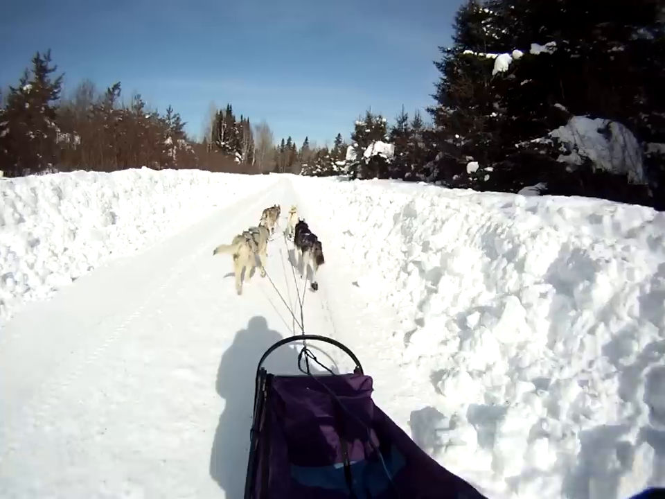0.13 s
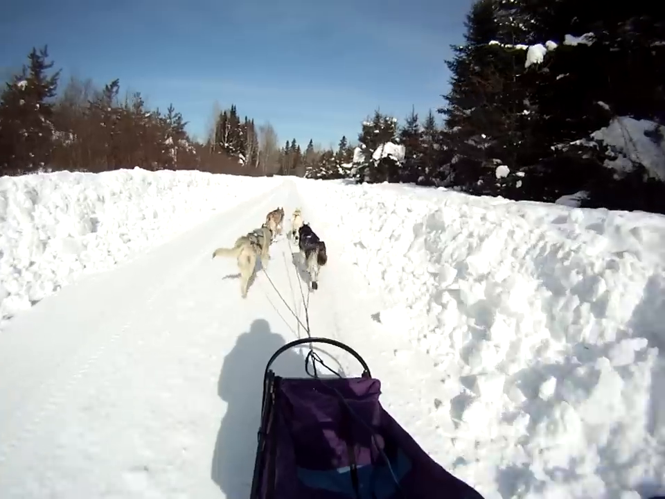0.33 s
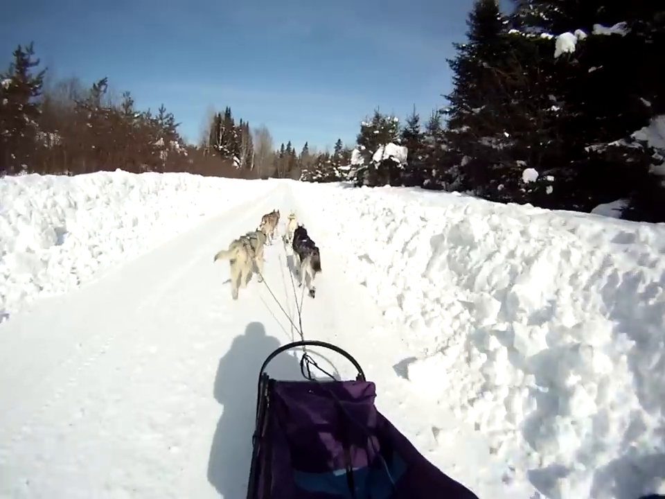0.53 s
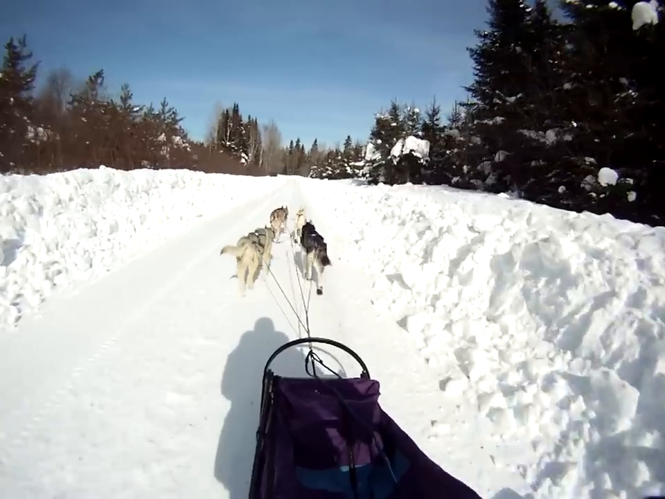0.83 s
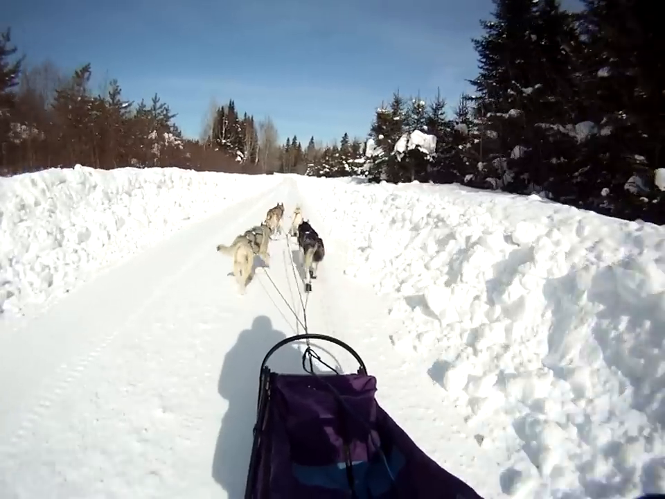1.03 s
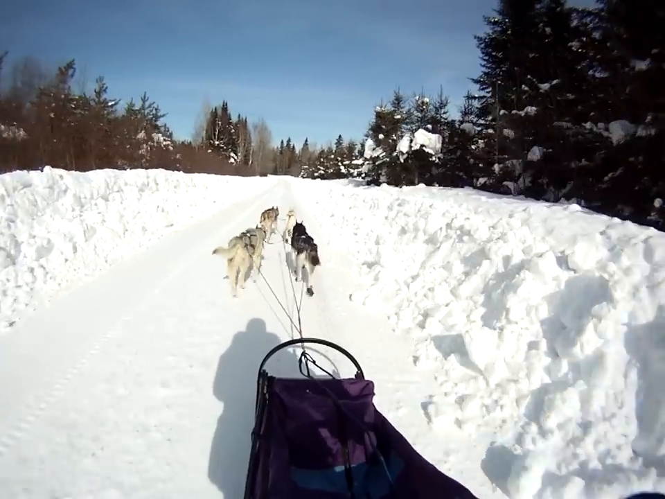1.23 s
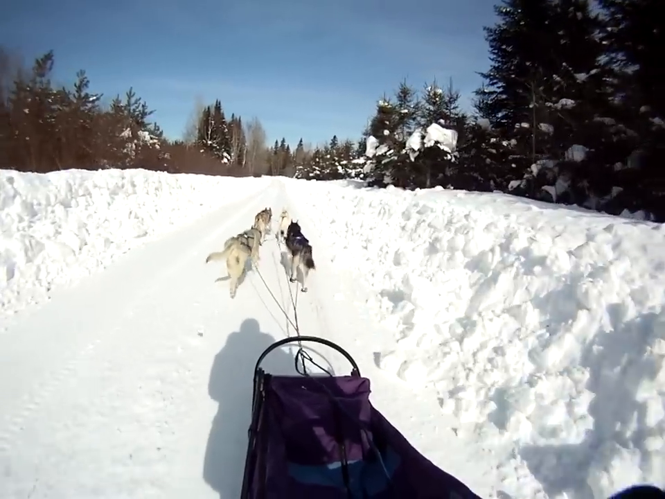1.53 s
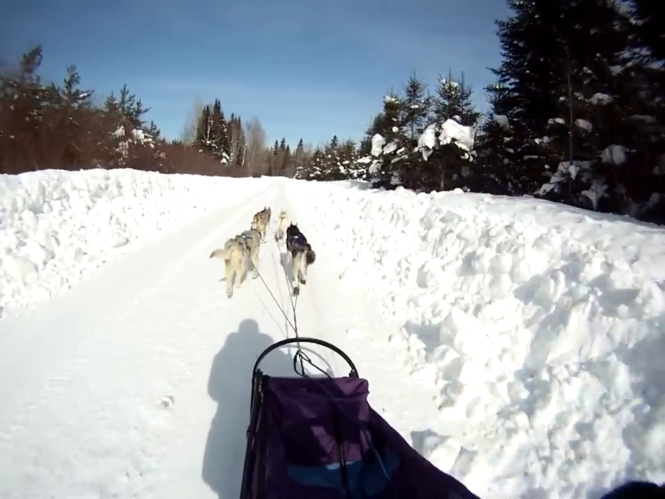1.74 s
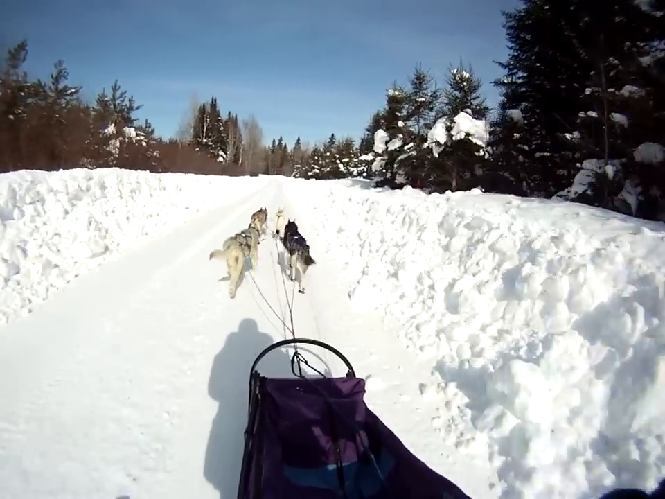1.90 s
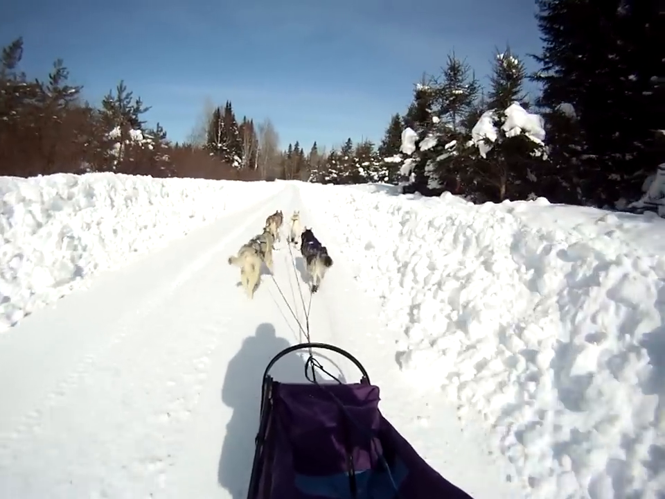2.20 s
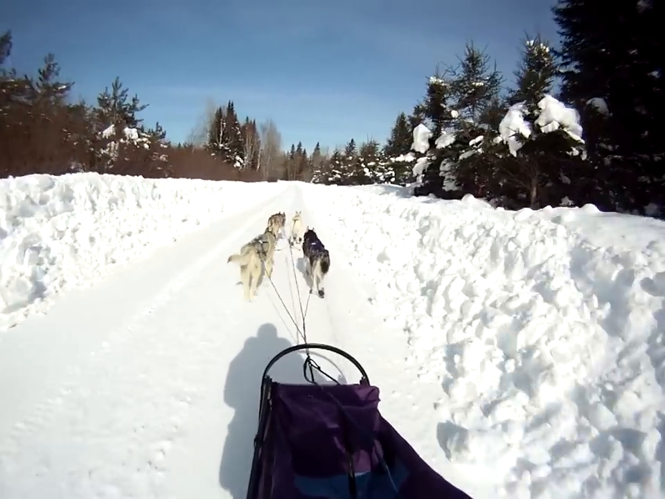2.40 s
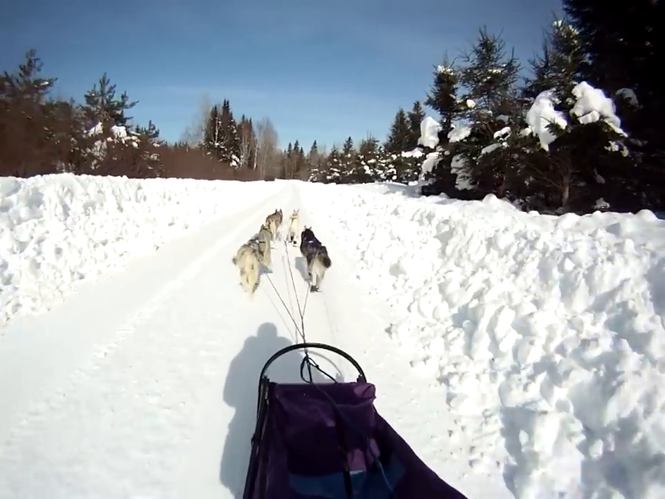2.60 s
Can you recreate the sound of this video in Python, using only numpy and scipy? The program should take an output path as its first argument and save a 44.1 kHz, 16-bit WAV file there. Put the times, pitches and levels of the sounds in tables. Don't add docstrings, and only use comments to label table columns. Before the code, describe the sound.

Sled runners rub over packed snow in a steady, grainy hiss, boxy and ringing in the midrange, with a harsh low-quality digital edge. After a very brief fade-in, crunches crowd 0.28-0.53 s, one falls at 0.8, a cluster at 1.32-1.6, then scattered crackles from 1.93 to 2.65. Faint dull frame thuds, clearest near 1.56 and 1.94, and uneven low wind buffeting continue beneath.

```python
import sys
import numpy as np
from scipy import signal
from scipy.fft import rfft, irfft, next_fast_len
from scipy.io import wavfile
from scipy.ndimage import uniform_filter1d, map_coordinates

SR = 44100
rng = np.random.default_rng(int(sys.argv[2]) if len(sys.argv) > 2 else 0)


def materialize(psi):
    bounded = np.clip(np.atleast_2d(psi).T, -1, 1)
    quanta = np.round(bounded * 32767).astype(np.int16)
    wavfile.write(sys.argv[1], SR, quanta)


def linear_from_db(decibels):
    return 10 ** (np.asarray(decibels, float) / 20)


N = 121275
HOLD_HZ = 12000

# time in seconds, level in dB.
GLIDE = [(.06, -46.5), (.27, -44), (.35, -46), (.44, -46.5), (.62, -45.5), (.78, -47.5), (.92, -45),
         (1.07, -45), (1.28, -46.5), (1.36, -43), (1.52, -48), (1.62, -44), (1.88, -45.5), (2.0, -44),
         (2.2, -46.5), (2.31, -46), (2.44, -45.5), (2.55, -46.5)]
# start in seconds, peak in dB, colour in Hz,
# time to fall 60 dB in seconds.
CRUNCHES = [(.277, -24.5, 3490, 0.04), (.298, -21.5, 2040, 0.054), (0.3644, -21, 2500, 0.084),
            (0.3808, -18.5, 3100, 0.037), (.3845, -23.5, 3000, 0.039), (.409, -24, 1320, 0.075),
            (0.4267, -22, 2700, 0.065), (0.4566, -28, 1950, 0.047), (.515, -31, 2100, .04),
            (.529, -27.5, 3520, 0.063), (.79, -25, 2050, 0.038), (1.3185, -25, 2036, 0.063),
            (1.3332, -22.5, 2000, 0.058), (1.349, -21.5, 2570, 0.059), (1.3795, -24.5, 2000, 0.057),
            (1.426, -27, 2040, 0.055), (1.558, -25, 2500, 0.095), (1.589, -26.5, 2060, .05),
            (1.933, -22, 2600, 0.053), (1.973, -22.5, 2100, 0.07), (1.995, -24.5, 1910, .055),
            (2.065, -26, 2170, 0.062), (2.074, -21, 3530, 0.031), (2.1035, -25.5, 2070, 0.031),
            (2.2095, -23.5, 4060, 0.061), (2.378, -19, 2600, 0.051), (2.404, -21, 2040, .07),
            (2.447, -26.5, 3630, .06), (2.466, -23, 2980, 0.038), (2.621, -20.5, 3440, 0.073)]
# centre in Hz, width in Hz, level in dB.
CASE_MODES = [(579, 91, -11.5), (1276, 196, -5.5), (1906, 160, -6), (2040, 68, -2), (2230, 360, -14.5),
              (2500, 44, -3.5), (2613, 153, -7), (3030, 190, -13), (3482, 91, -4), (3755, 330, -14),
              (4713, 133, -14), (5380, 67, -17)]
# frequency in Hz, level in dB.
WALLS = [(150, -50), (400, -15.5), (780, -16.5), (1500, -23.5), (3000, -16.5), (4300, -18.5), (5500, -19),
         (5950, -30.5)]
# start in seconds, peak in dB, pitch in Hz,
# time to fall 60 dB in seconds.
THUDS = [(.21, -45, 253, 0.19), (.377, -43.5, 275, 0.12), (.438, -48, 104, 0.16), (.576, -49.5, 199, .12),
         (.787, -47, 190, 0.11), (1.343, -50, 249, 0.25), (1.389, -43.5, 99, .2),
         (1.559, -38.5, 185, 0.067), (1.572, -45, 118.5, .12), (1.76, -47.5, 139, 0.16),
         (1.944, -41, 195, 0.076), (2.037, -51, 111, 0.14), (2.385, -54, 227, .12),
         (2.445, -46.5, 95, 0.12), (2.597, -50, 200, 0.24)]
# centre in seconds, peak in dB, rate in Hz.
SWAYS = [(0.099, -36.5, 24), (0.263, -42, 35), (0.463, -33.5, 22.5), (0.607, -40, 27), (0.691, -32, 27),
         (0.791, -39.5, 23), (0.907, -43, 16), (0.992, -43.5, 35), (1.076, -34.5, 19.5), (1.256, -40.5, 16),
         (1.39, -38.5, 18), (1.5, -39.5, 14), (1.61, -35.5, 19), (1.702, -35, 26), (1.861, -46, 12),
         (2.006, -37.5, 15), (2.104, -43, 8.2), (2.241, -43.5, 46), (2.415, -37, 36), (2.54, -44.5, 18),
         (2.66, -38.5, 32)]
# frequency in Hz, level in dB per Hz.
RUMBLE = [(9, -52), (16, -15.5), (40, -4), (120, -14.5), (300, -17.5), (500, -23), (900, -65), (1500, -120)]


def unit(x):
    return x / np.sqrt(np.mean(x ** 2) + 1e-20)


def along(points, hz):
    f, v = np.transpose(points)
    return np.interp(np.log(hz + 1), np.log(f + 1), v)


def wobble(rate):
    knots = rng.standard_normal(int(N * rate / SR) + 4)
    return map_coordinates(knots, [np.arange(N) * rate / SR])


def filtered(x, response):
    m = next_fast_len(x.shape[-1] + SR // 4)
    spectrum = rfft(x, m) * response(np.fft.rfftfreq(m, 1 / SR))
    return irfft(spectrum, m)[..., :x.shape[-1]]


def causal(gain):
    cepstrum = irfft(np.log(gain + 1e-6))
    half = len(cepstrum) // 2
    fold = np.r_[1, 2 * np.ones(half - 1), 1, np.zeros(len(cepstrum) - half - 1)]
    return np.exp(rfft(cepstrum * fold, len(cepstrum)))[:len(gain)]


def glide():
    s, db = np.transpose(GLIDE)
    flutter_db = 0.7 * (wobble(8.94) + wobble(35.03) + wobble(120))
    pressure = linear_from_db(np.interp(np.arange(N) / SR, s, db) + flutter_db)
    return pressure * unit(patchy_hiss(depth_db=1) + linear_from_db(-4.5) * grains())


def patchy_hiss(depth_db):
    z = signal.stft(rng.standard_normal(N + 512), nperseg=512)[2]
    field = uniform_filter1d(rng.standard_normal(z.shape), 6, 0)
    field = uniform_filter1d(field, 6, 1)
    return unit(signal.istft(z * linear_from_db(depth_db * unit(field)), nperseg=512)[1][:N])


def grains():
    per_s, clump, clump_s = 900, 4, 0.03
    centre_hz, octaves, cycles, spread_db = 2600, 0.75, 3.12, 2.6
    d = rng.random((int(per_s * 3), 4))
    hz = np.clip(centre_hz * 2 ** (octaves * 2 * (d[:, 1:2] + d[:, 3:] - 1)), 500, 5600)
    size = linear_from_db(-spread_db * np.log(d[:, 2:3] + 0.06))
    k = np.arange(256)
    decay = np.exp(-k / SR * hz / cycles * 2)
    ring = size * np.sqrt(hz) * np.sin(2 * np.pi * hz * k / SR) * decay
    clump_at = np.repeat(d[::clump, :1], clump, axis=0)[:len(d)] * N
    at = clump_at + clump_s * SR * d[::-1, 1:2] ** 2
    return unit(np.bincount((at.astype(int) + k).ravel(), ring.ravel())[:N])


def crunches():
    width_hz, broad, rise = 820, 0.56, 0.038
    snap_level, snap_t60 = 0.93, 0.012
    out, t = np.zeros(N + SR), np.arange(SR // 8) / SR
    noise = rng.standard_normal((len(CRUNCHES), 2, len(t)))
    for (s, db, hz, t60), (n, rag) in zip(CRUNCHES, noise):
        ragged = linear_from_db(0.68 * unit(uniform_filter1d(rag, 70)))
        burst = unit(filtered(n, lambda f: broad + 1 / (1 + (2 * (f - hz) / width_hz) ** 2)))
        snap = snap_level * linear_from_db(-60 * t / snap_t60) * np.sin(2 * np.pi * hz * t)
        shape = linear_from_db(-60 * t / t60) * (1 - np.exp(-t / (rise * t60)))
        out[round(s * SR):][:len(t)] += linear_from_db(db - 4.5 - 10) * (shape * ragged * burst + snap)
    return out[:N]


def case(x):
    def gain(f):
        power = linear_from_db(2 * along(WALLS, f))
        for centre, width, db in CASE_MODES:
            power = power + linear_from_db(2 * db) / (1 + (2 * (f - centre) / width) ** 2) ** 1.33
        power = power * (f < HOLD_HZ / 2)
        return causal(np.sqrt(power / power.mean()))
    return filtered(x, gain)


def thuds():
    rise_s, level_db, puff_level = 0.0027, 2, 0.48
    out, t = np.zeros(N + SR), np.arange(SR // 3) / SR
    chance = rng.standard_normal((len(THUDS), 2, len(t)))

    def puff_band(f):
        return f / 60 / (1 + (f / 60) ** 2) ** .5 / (1 + (f / 260) ** 4)

    for (s, db, hz, t60), (drift, n) in zip(THUDS, chance):
        puff = unit(filtered(n, puff_band))
        ring = np.sin(2 * np.pi * hz * t + 0.024 * np.cumsum(drift))
        shape = linear_from_db(db + level_db - 60 * t / t60) * (1 - np.exp(-t / rise_s))
        out[round(s * SR):][:len(t)] += shape * (ring + puff_level * puff)
    return out[:N]


def wind():
    sway_s, sway_db = 0.031, -2.5
    rumble_db, lumps_db, follows = -52.5, -2, 0.27
    t = np.arange(N) / SR
    turns = rng.random(len(SWAYS))
    shapes = [linear_from_db(db + sway_db) * np.exp(-.5 * ((t - s) / sway_s) ** 2) for s, db, hz in SWAYS]
    swings = np.zeros(N)
    for shape, (s, db, hz), turn in zip(shapes, SWAYS, turns):
        swings += shape * np.cos(2 * np.pi * (hz * (t - s) + turn))
    rumble = unit(filtered(rng.standard_normal(N), lambda f: linear_from_db(along(RUMBLE, f))))
    swell = (1 + follows * unit(sum(shapes))) * linear_from_db(lumps_db * wobble(12))
    return swings + linear_from_db(rumble_db) * unit(rumble * swell)


def scene():
    runners = case(glide() + crunches())
    return (runners + thuds() + wind())[None]


def top_cut(x):
    return signal.sosfilt(signal.butter(12, 15780, fs=SR, output="sos"), x)


def record(dry):
    start_s, fade_s = 0.034, 0.017
    top_hz, edge_hz = 15280, 25
    t = np.arange(N) / SR
    faded = dry * np.sin(np.pi / 2 * np.clip((t - start_s) / fade_s, 0, 1)) ** 2
    mirrored = faded * (1 + 2 * np.cos(2 * np.pi * HOLD_HZ * t))

    def hold(f):
        edge = 0.028 + 0.75 * (1 - np.tanh((f - top_hz) / edge_hz)) / 2
        return np.sinc(f / HOLD_HZ) * edge * (f < top_hz + 250)

    return top_cut(filtered(mirrored, hold))


dry = scene()
out = record(dry)
materialize(out)
```